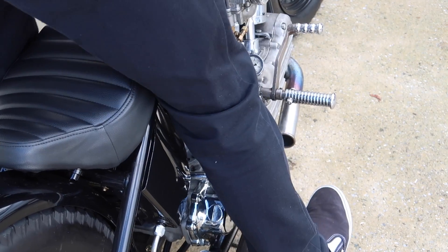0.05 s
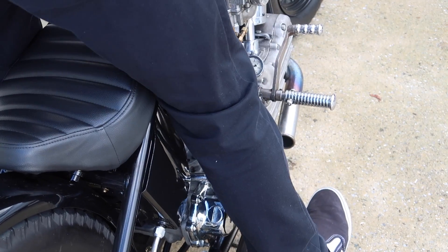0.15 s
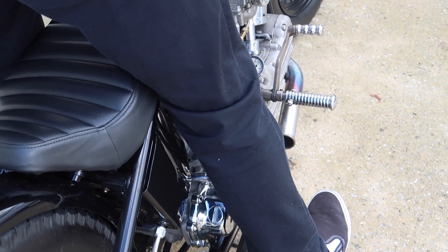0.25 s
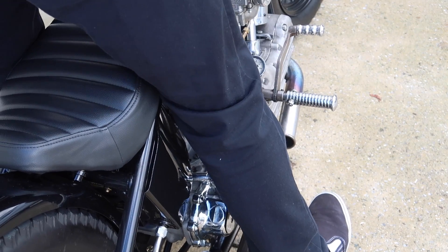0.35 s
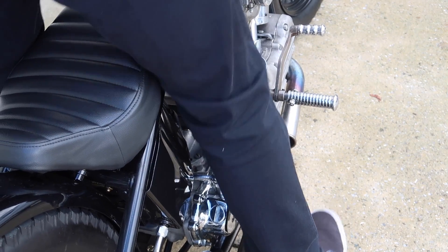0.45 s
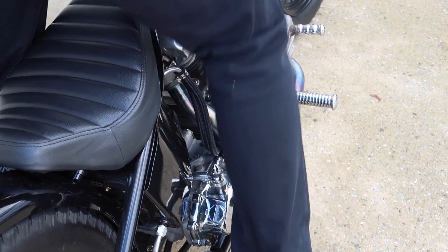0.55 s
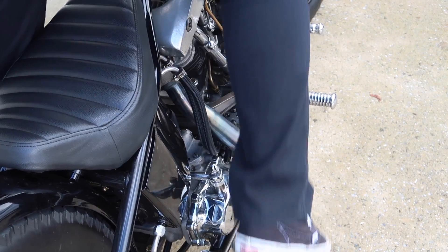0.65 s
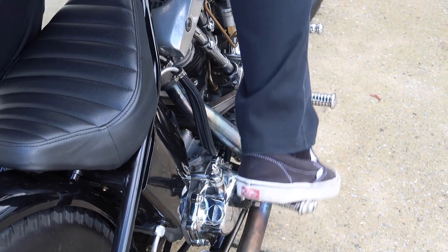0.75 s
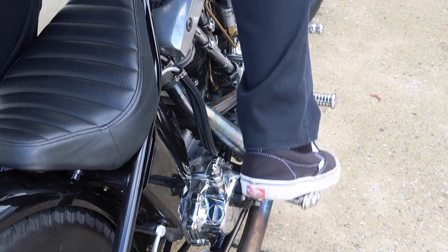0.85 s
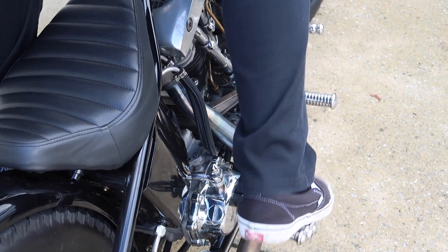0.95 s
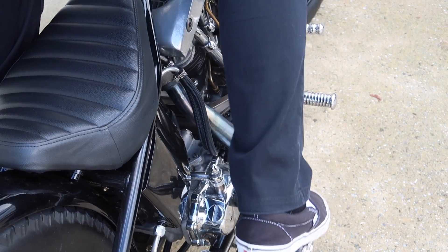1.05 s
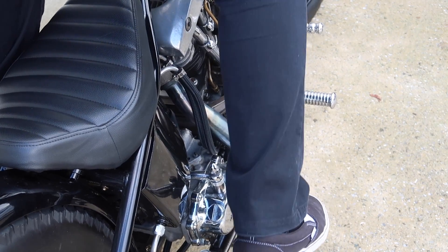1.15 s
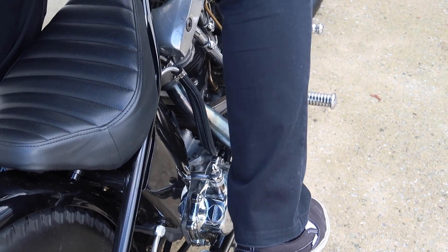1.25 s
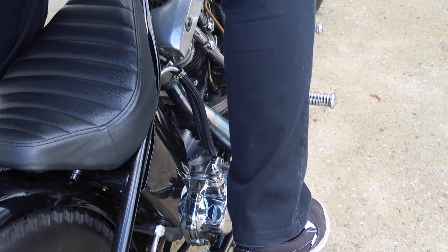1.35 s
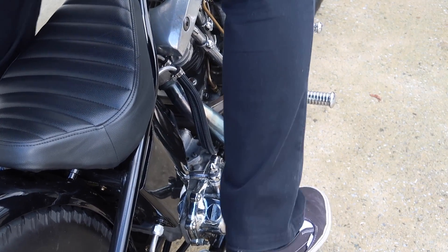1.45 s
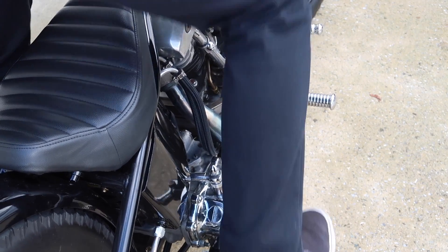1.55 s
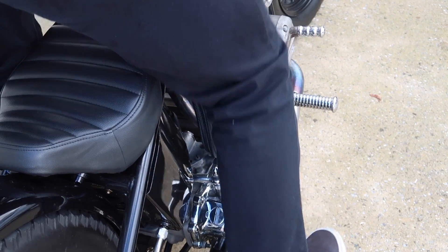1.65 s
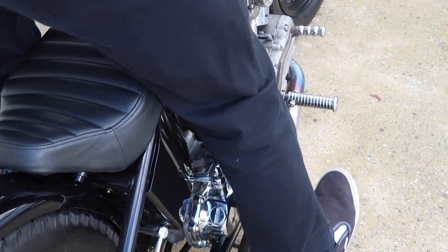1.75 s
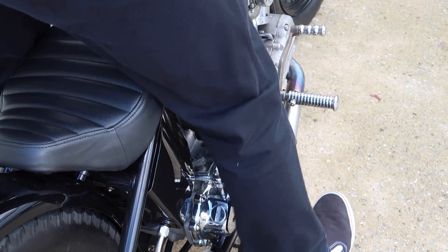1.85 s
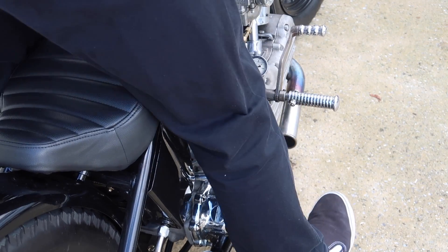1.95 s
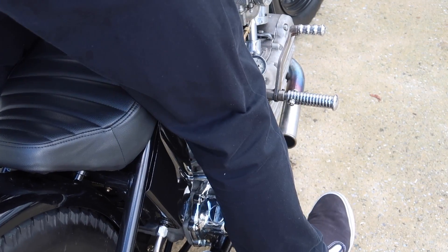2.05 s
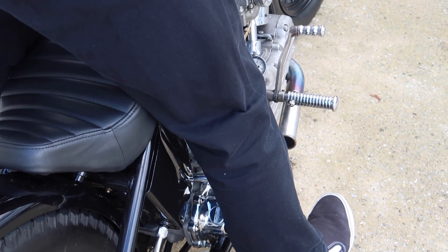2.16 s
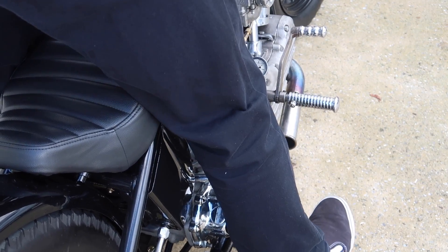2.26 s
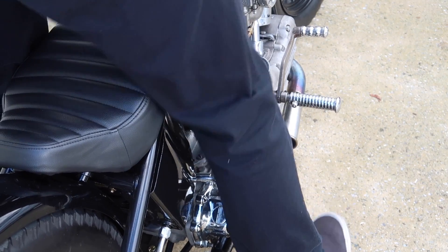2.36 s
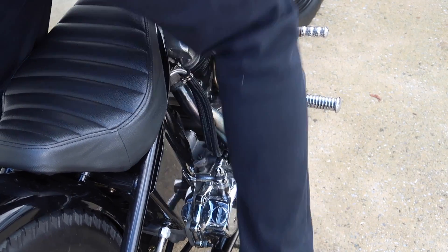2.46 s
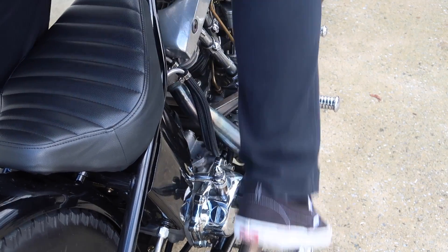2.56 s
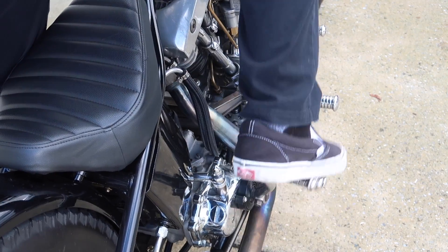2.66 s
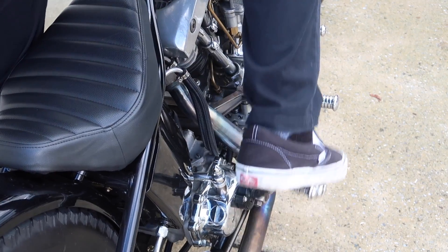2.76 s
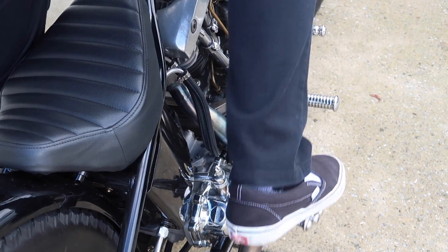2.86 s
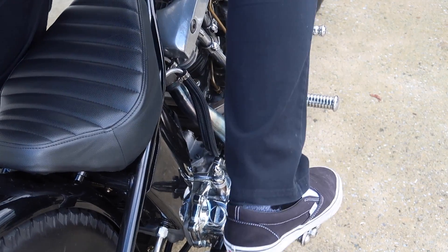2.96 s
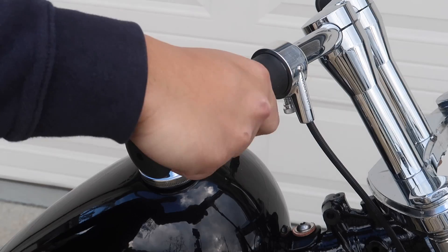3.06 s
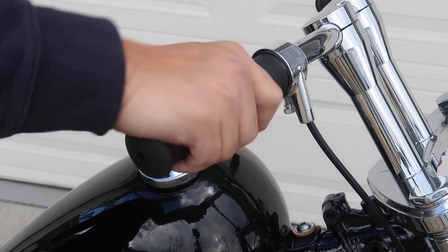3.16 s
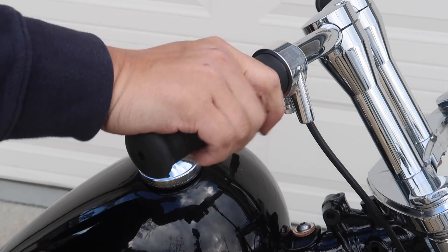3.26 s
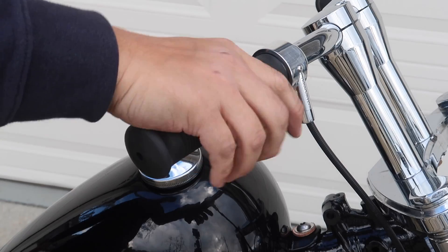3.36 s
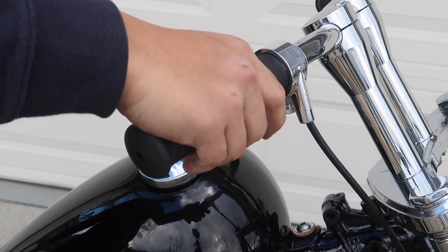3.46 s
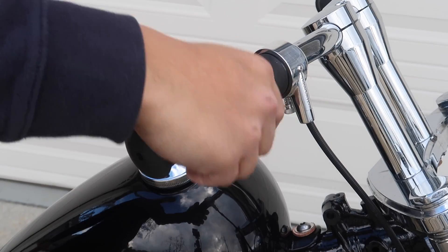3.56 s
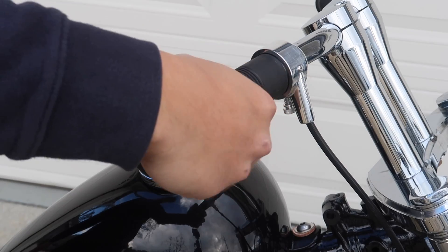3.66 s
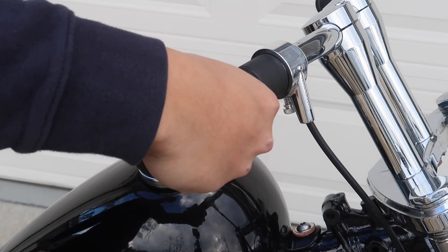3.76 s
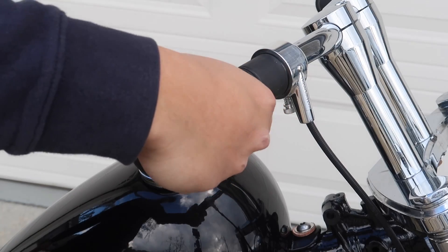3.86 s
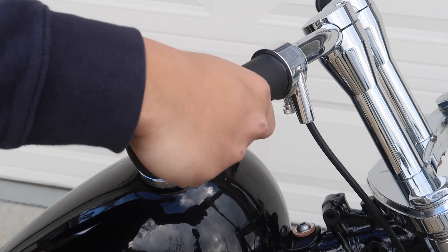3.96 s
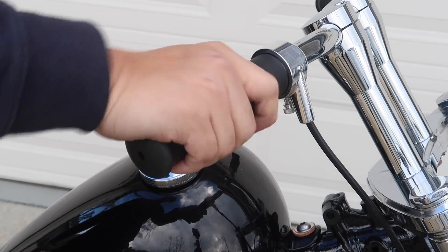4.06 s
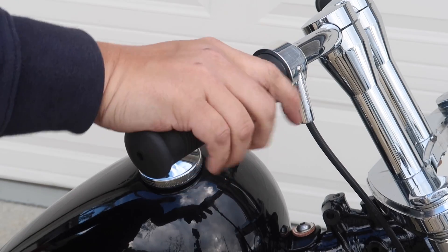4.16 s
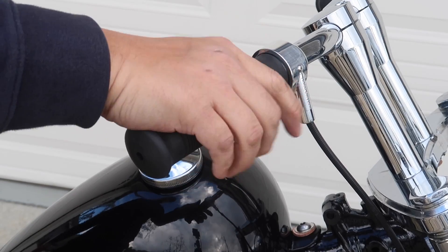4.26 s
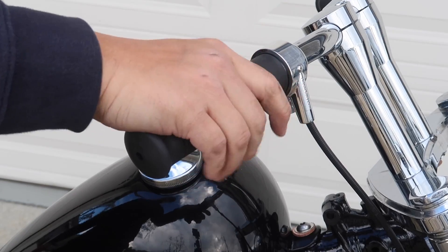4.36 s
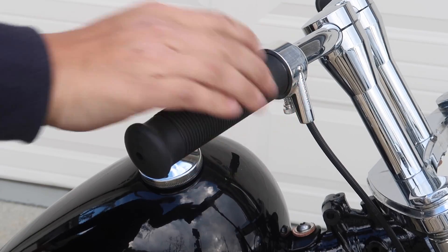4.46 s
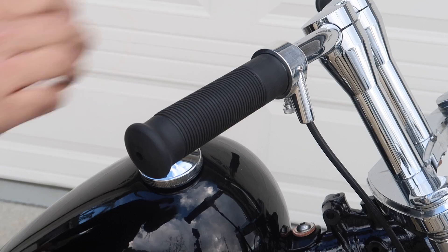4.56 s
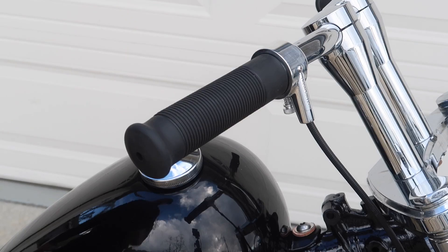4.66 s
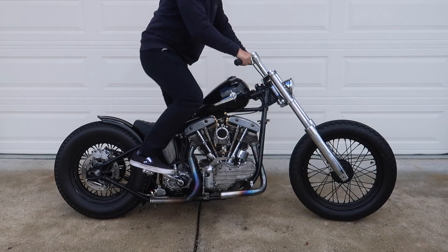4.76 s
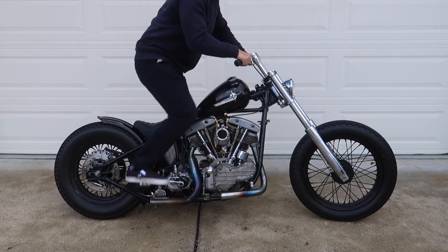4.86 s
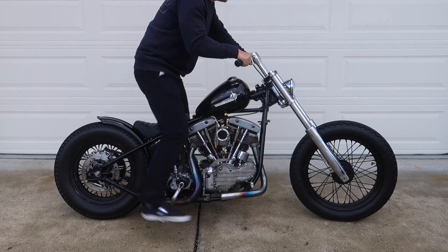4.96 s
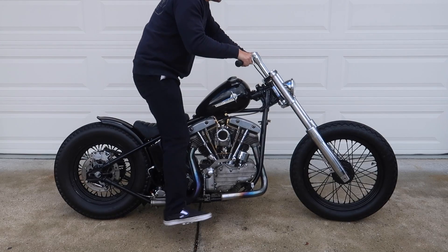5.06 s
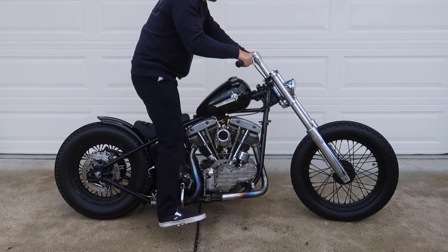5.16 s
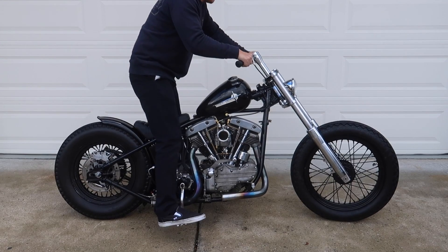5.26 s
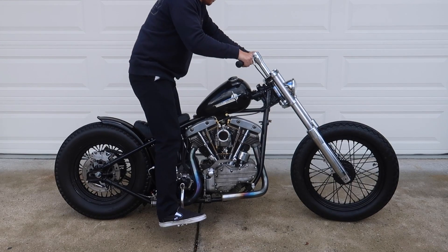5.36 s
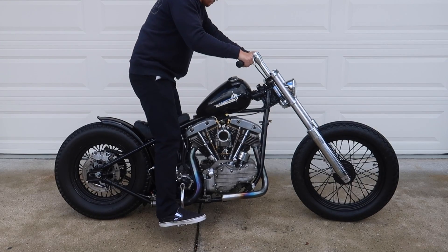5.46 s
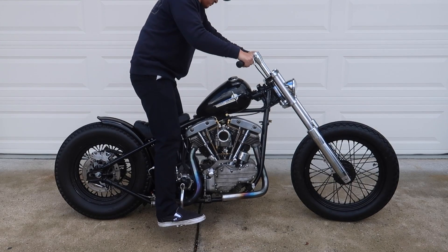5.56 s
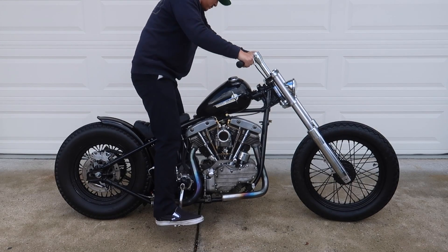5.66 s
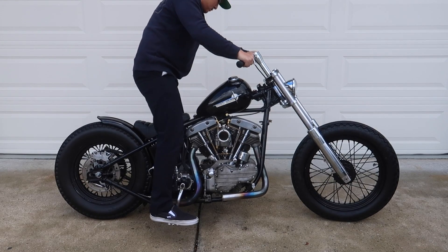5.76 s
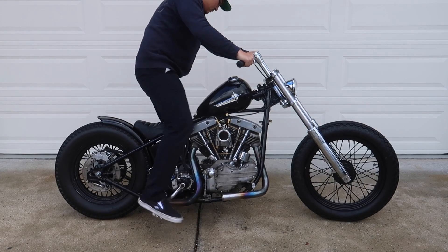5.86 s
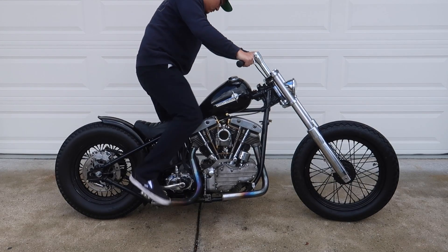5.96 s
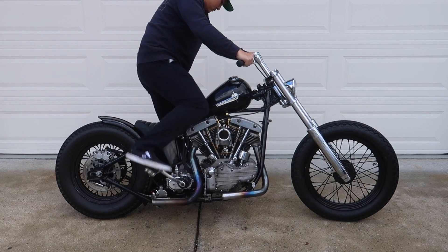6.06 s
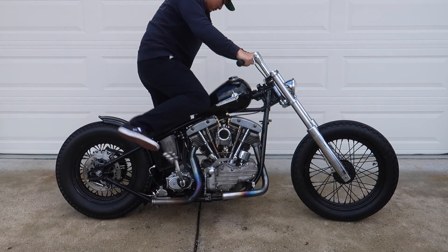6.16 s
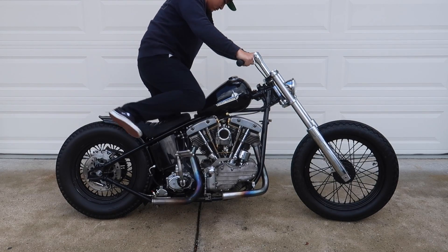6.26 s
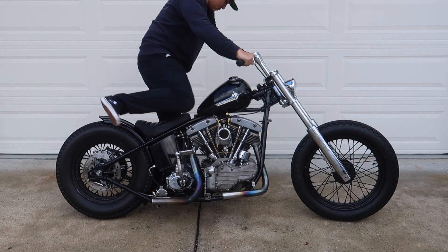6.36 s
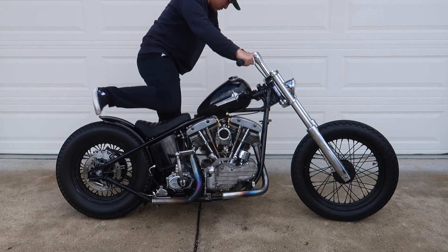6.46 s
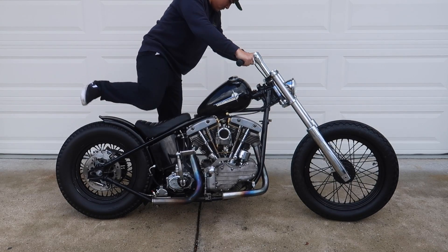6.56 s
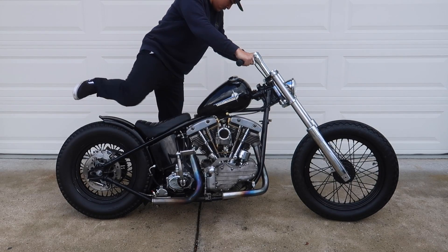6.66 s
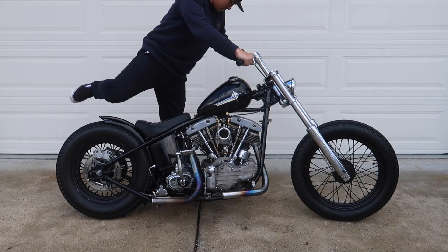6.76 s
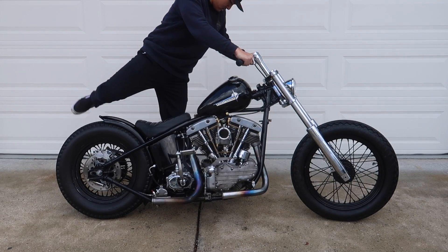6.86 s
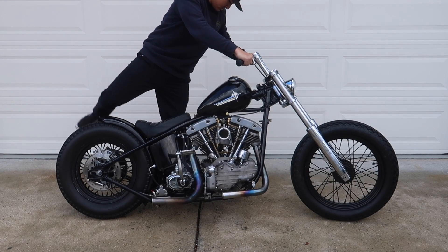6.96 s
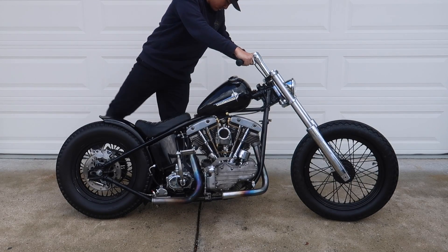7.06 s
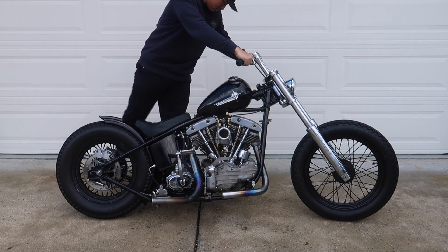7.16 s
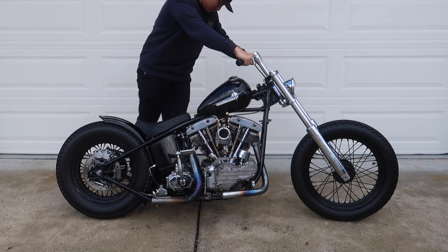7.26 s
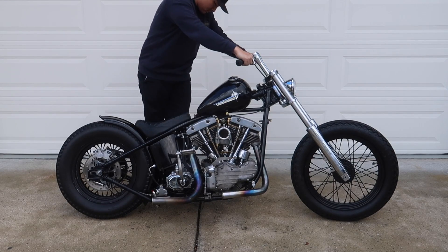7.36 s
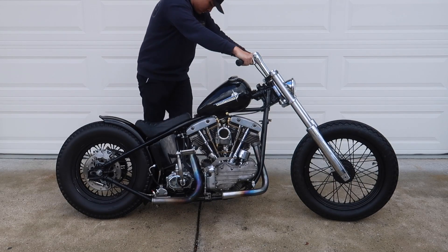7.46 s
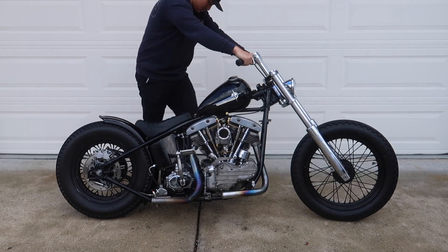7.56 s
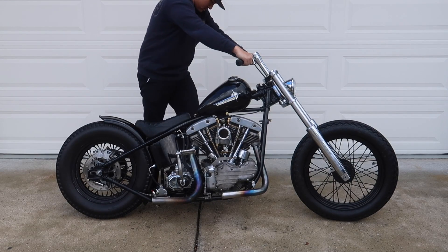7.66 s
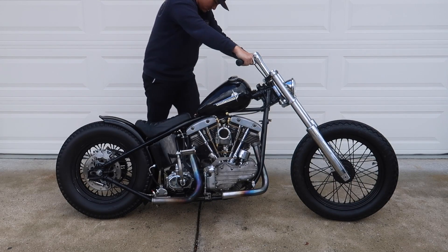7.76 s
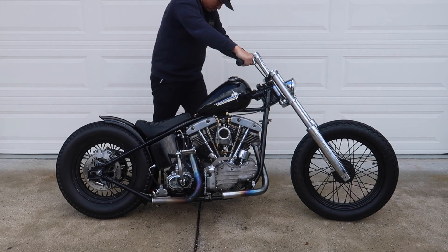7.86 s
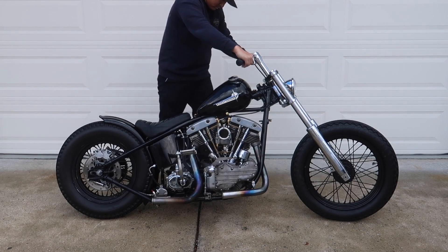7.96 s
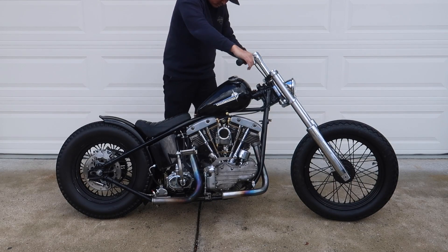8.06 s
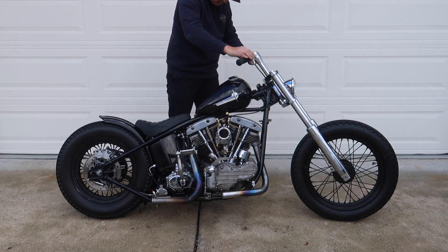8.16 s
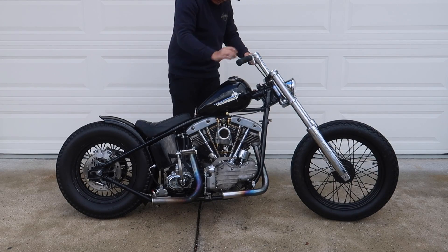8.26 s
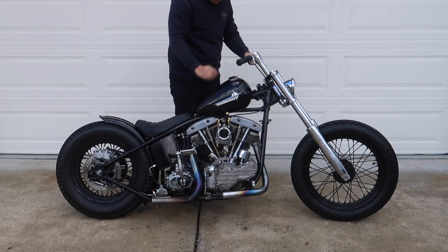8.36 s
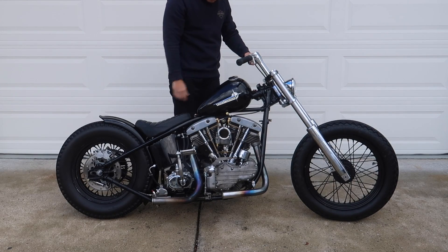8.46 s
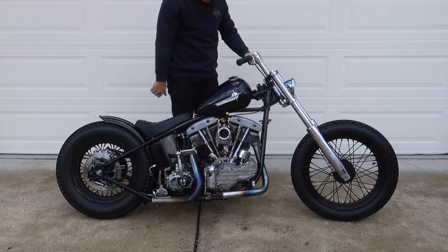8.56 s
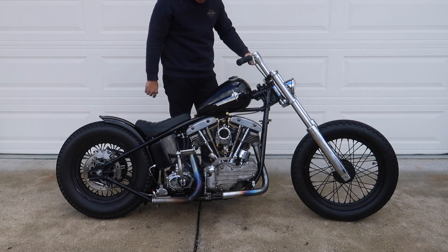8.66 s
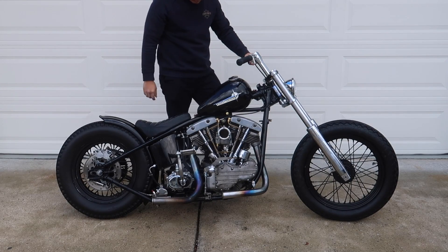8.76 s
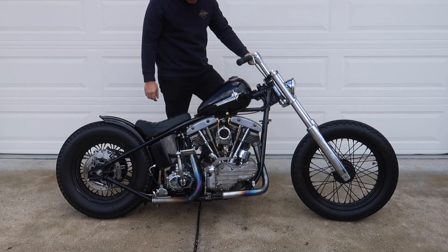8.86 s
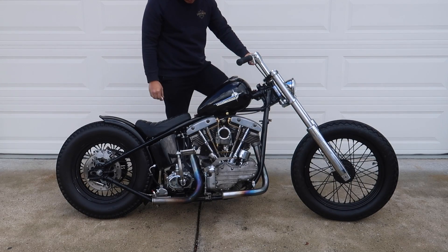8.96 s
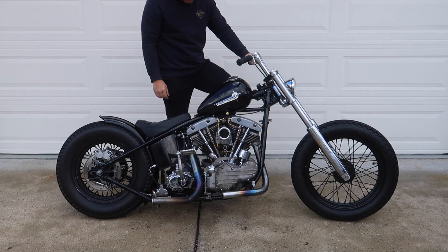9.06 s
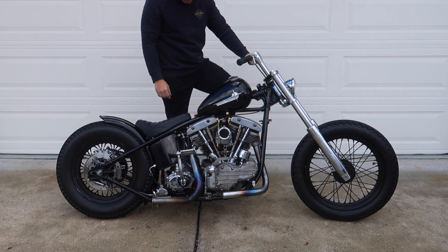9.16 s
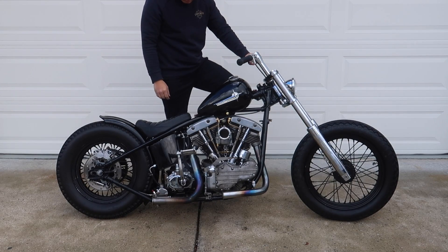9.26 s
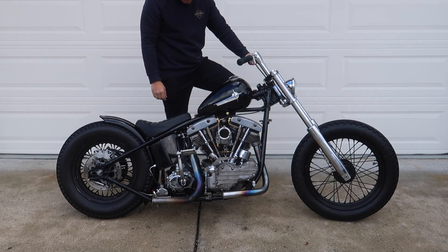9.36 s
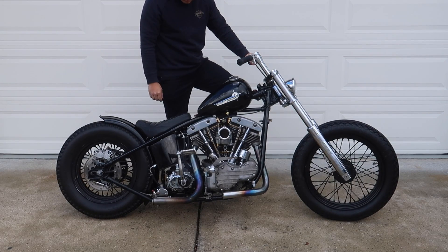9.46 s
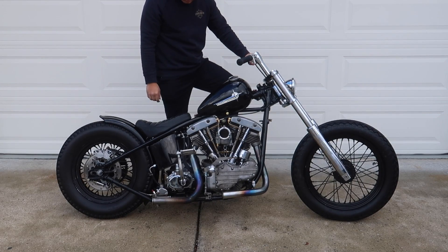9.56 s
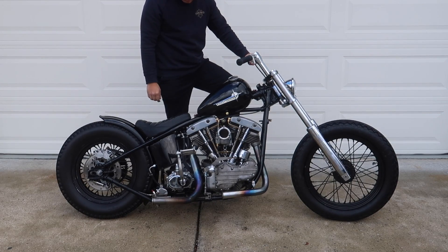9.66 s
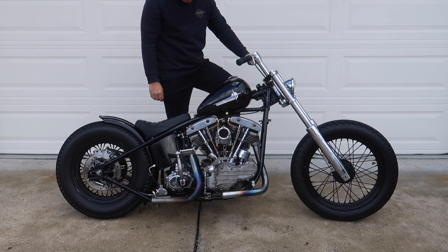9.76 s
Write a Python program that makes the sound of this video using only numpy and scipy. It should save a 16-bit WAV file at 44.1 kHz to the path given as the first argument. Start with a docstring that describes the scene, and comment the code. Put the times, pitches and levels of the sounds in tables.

```python
"""A big V-twin with short open pipes is kicked over, catches at about 5.3 s and lopes at idle; from 7.9 s the
rear cylinder misses every other cycle. Each exhaust stroke is a crack of jet noise and a pipe ring, a sine that
climbs in pitch until the valve shuts. Before that the lever ratchets (noise bursts striking decaying modes),
parts rub and gas wheezes under the last kicks (swells of filtered noise), a hand rustles on the throttle grip
and the grip snaps shut twice. Clatter fills the idle; distant traffic and air, and a barely audible high
whistle, lie beneath."""
import sys
import numpy as np
from scipy import signal
from scipy.io import wavfile
from scipy.ndimage import uniform_filter1d

SR = 44100
rng = np.random.default_rng(int(sys.argv[2]) if len(sys.argv) > 2 else 0)


def bounce(signal):
    """Save signal as a 16-bit WAV file at the path given by the first command-line argument."""
    frames = np.transpose(np.atleast_2d(signal))
    limited = np.clip(frames, -1, 1)
    pcm = np.round(limited * 32767).astype(np.int16)
    wavfile.write(sys.argv[1], SR, pcm)


N = 433062
T = np.arange(N) / SR

# ringing modes of crankcase and lever: f/Hz, relative level/dB, t60/s
CASE_MODES = [(740, -28, 0.05), (871, -12, 0.19), (1016, -18.5, 0.13), (1105, -8, 0.15),
              (2064, -10.5, 0.05), (2307, -14.5, 0.14), (2630, -10, 0.03), (3046, -21.5, 0.21),
              (3850, -18, 0.096), (4440, -21.5, 0.095)]


def undb(db):
    """Level in decibels to amplitude ratio."""
    return np.exp(np.asarray(db) * np.log(10) / 20)


def unit(x):
    """Normalization to an rms of 1."""
    return x / np.sqrt(np.mean(x ** 2))


def band(x, hz, width_hz):
    """Second-order resonance with gain 1 at its centre."""
    return signal.lfilter(*signal.iirpeak(hz, hz / width_hz, fs=SR), x)


def colour(x, bands):
    """Superposed broad resonances, each a cascade of two: (f/Hz, width/Hz, relative level/dB)."""
    return sum(undb(db) * band(band(x, hz, width), hz, 2 * width) for hz, width, db in bands)


def ring(x, modes):
    """Modal response: each mode's impulse response is a decaying sine."""
    out = 0
    for hz, db, t60 in modes:
        pole = np.exp((2j * np.pi * hz - np.log(1000) / t60) / SR)
        out = out + undb(db) * signal.lfilter([0, pole.imag], [1, -2 * pole.real, abs(pole) ** 2], x)
    return out


def dull(x, hz):
    """Low-pass radiation: heavy castings give off little above hz."""
    return signal.sosfilt(signal.butter(2, hz, fs=SR, output="sos"), x)


def fade(t, t60):
    """Exponential decay by 60 dB in t60 seconds, from t = 0."""
    return np.exp(-np.log(1000) * np.maximum(t, 0) / t60)


def walk(rate):
    """Slow random modulation: Gaussian values joined by straight ramps of 1 / rate seconds."""
    k = int(SR / rate)
    return uniform_filter1d(np.repeat(rng.standard_normal(N // k + 1), k), k)[:N]


def add(out, s, x):
    """Superposition of x on out from time s."""
    k = int(s * SR)
    out[k:k + len(x)] += x[:N - k]


def swell(t, s, rise_s, hold_s, t60, db):
    """Exponential envelope: climbs 28 dB in rise_s up to time s, holds, then decays."""
    return undb(db - 28 * np.maximum(s - t, 0) / rise_s) * fade(t - s - hold_s, t60)


def play(rows, voice):
    """Amplitude modulation of voice(span, last column) by each row's swell."""
    out = np.zeros(N)
    for s, rise_s, hold_s, t60, db, control in rows:
        span = slice(int(max(s - 2 * rise_s, 0) * SR), int((s + hold_s + t60) * SR))
        out[span] += swell(T[span], s, rise_s, hold_s, t60, db) * voice(span, control)
    return out


def chatter(events, t60, tail_db, tail_t60, rise_s=0.00068):
    """Impact excitation: each blow (t/s, level/dB) is a quick noise tick and a dying chatter of bounces."""
    drive = np.zeros(N)
    t = np.arange(int(.25 * SR)) / SR
    shape = np.clip(t / rise_s, 0, 1) * (fade(t, t60) + undb(tail_db) * fade(t, tail_t60))
    for (s, db), noise in zip(events, rng.standard_normal((len(events), len(t)))):
        add(drive, s, undb(db) * noise * shape)
    return drive


def air():
    """Band-filtered noise of distant traffic and air; each band flickers alone, the bass is alike on both ports."""
    # spectrum, interpolated over log frequency: f/Hz, relative level/dB
    spectrum = [(25, 16.5), (45, -14.5), (81, 15.5), (150, -7.5), (240, -11), (440, -20.5), (1000, -36),
                (2500, -23), (6000, -81.5), (15000, -83.5)]
    hz_points, db_points = np.transpose(spectrum)
    out = 0
    for hz in 28 * 2 ** np.arange(0, 9.1, .7):
        mid = band(rng.standard_normal(N), hz, hz / 2)
        side = band(rng.standard_normal(N), hz, hz / 2)
        db = np.interp(np.log(hz), np.log(hz_points), db_points) + 2.0 * walk(15)
        side_share = np.clip(hz / 500 - .2, 0, 1)
        out = out + undb(db) * (mid + side_share * side * np.array([[1], [-1]]))
    return unit(out) * undb(-45)


def whistle():
    """A pure tone at 10.1 kHz; growth and decay cross at 0.5 s, where it peaks near -84 dB."""
    # the negative hold starts the decay before the growth is complete
    return swell(T, s=2, rise_s=1.5, hold_s=-1.5, t60=.08, db=-56) * np.sin(2 * np.pi * 10100 * T)


def rub_and_wheeze():
    """Swells of noise, part rung through the case, part dry: gears and shoe rubbing, and from 4.99 s gas
    wheezing under the last kicks; a thin whine rides on the fizz."""
    # swells: loudest from t/s, rise/s, hold/s, t60/s, level/dB, fizz against body/dB
    rubs = [(.03, .12, 0.025, .3, -24.5, -9), (.1, 0.091, .01, 0.85, -36.5, -7),
            (.54, .06, .005, .1, -35, -27), (.86, .02, .02, 0.45, -42, -31),
            (1.0, 0.087, .01, .2, -43, -38), (1.17, .06, 0.0091, 0.42, -50.5, -9),
            (1.63, 0.11, 0.085, .3, -38.5, -10), (1.79, 0.16, 0.069, 0.23, -27.5, -16),
            (2.07, 0.26, 0.034, 0.77, -42.5, -4.5), (2.41, 0.12, .01, .1, -45, -20),
            (2.83, .15, 0.045, 1.05, -44.5, -30), (4.87, .02, .08, .3, -50.5, -19),
            (4.99, 0.032, 0.046, .2, -29, 0.5), (5.08, 0.049, 0.0046, 0.19, -21, -9),
            (5.195, 0.062, .005, 0.19, -20, -9), (5.3, .03, 0.0055, 0.092, -26, -9)]
    # thin treble resonances: f/Hz, width/Hz, relative level/dB
    whine = [(2415, 93, 1), (3840, 63, -4), (3950, 40, -6), (4910, 59, -4), (5600, 52, -9.5),
             (6420, 38, -10.5), (7500, 40, -10)]
    ends_s = 5.7
    noise = rng.standard_normal((2, N)) * undb(2.0 * walk(150))
    grit, spray = noise[:, :int(ends_s * SR)]
    rung = unit(dull(ring(grit, CASE_MODES), 7700))
    dry_rub = unit(colour(grit, [(438, 480, 13.3), (787, 950, 10.3), (1400, 810, 3.3), (2310, 970, 2.1)]))
    body = unit(0.43 * rung + dry_rub)
    hiss = unit(dull(band(spray, 4600, 4500), 9200))
    fizz = unit(hiss + 0.83 * unit(colour(grit, whine)))
    return play(rubs, lambda span, treble_db: body[span] + fizz[span] * undb(treble_db))


def pipe_ring(open_s, blow_db, top_db, open_hz, shut_hz, overtones):
    """Resonance of a shrinking cavity: the note climbs as the cylinder volume falls, then dies once the valve shuts."""
    start_turns, rise_s, shut_t60_s, lag_s = 0.057, 0.0033, 0.067, .004
    t = np.arange(int((open_s + .12) * SR)) / SR
    travel = np.clip(t / open_s, 0, 1)
    hz = open_hz + (shut_hz - open_hz) * travel ** 22.0  # nearly all the climb comes at the end
    loud = undb(blow_db + (top_db - blow_db) * travel ** 1.4)
    loud = loud * fade(t - open_s - lag_s, shut_t60_s) * np.clip(t / rise_s, 0, 1)
    out = loud * np.sin(2 * np.pi * (start_turns + np.cumsum(hz) / SR))
    late = np.maximum(t - lag_s, 0)
    for mode_hz, db, t60 in overtones:
        envelope = fade(late, t60) * np.clip(late / 0.001, 0, 1)
        out += undb(blow_db + db) * np.sin(2 * np.pi * mode_hz * late) * envelope
    return out


def jet_puff():
    """Choked-flow envelope: the jet swells as the valve cracks open, chokes off as pressure goes, and trails away."""
    crack_s, tail_db, tail_t60_s = 0.012, -6, 0.073
    t = np.arange(int(.1 * SR)) / SR
    progress = np.clip(t / crack_s, 0, 1)
    jet = np.sin(np.pi * progress ** 2.42)
    return jet + undb(tail_db) * progress * fade(t - crack_s, tail_t60_s)


def exhaust():
    """Blow-down excitation of every stroke: the pipe rings, and the jet envelopes of front and rear cylinder."""
    # slow strokes under the kick: t/s, valve open/s, crack level/dB, blow-down level/dB,
    # level at piston top/dB, pipe f while open/Hz
    kicked = [(.012, 0.16, -70, -34.5, -42, 68.6), (1.783, 0.14, -38, -22, -28.5, 66.6),
              (5.041, 0.089, -29, -13.5, -8, 73.4), (5.186, 0.061, -17.5, -5.5, -7, 79)]
    # front and rear pipe: f open/Hz, f shut/Hz, valve open share of the cycle,
    # blow-down level of a full burn/dB, weakest crack of a full burn/dB
    pipes = [(88.9, 140.6, 0.229, -10, -26), (91, 130.8, 0.211, -9.5, -26.5)]
    # higher pipe modes, mean over strokes: f/Hz, front and rear level against blow-down/dB, t60/s
    overtones = [(195, -2.5, -6.5, 0.039), (220.4, -20, -17, 0.13), (357.6, -8.5, -10.5, 0.12),
                 (456, -18, -42, 0.14), (685, -9, -40, 0.041), (1337, -20.5, -27.5, 0.096)]
    crack_lead_s = 0.0065
    puff = jet_puff()
    rings, gates = np.zeros(N), np.zeros((2, N))
    for s, open_s, crack_db, blow_db, top_db, open_hz in kicked:
        add(rings, s, pipe_ring(open_s, blow_db, top_db, open_hz, 114, [(346, -5.0, 0.079)]))
        add(gates[1], s, undb(crack_db) * puff)
    rows = strokes()
    cycle_s = 2 * uniform_filter1d(np.gradient(rows[:, 0]), size=3)
    chance = rng.standard_normal((len(rows), 2, len(overtones)))
    for k, (s, crack_db, top_db) in enumerate(rows):
        cylinder = k % 2
        open_hz, shut_hz, share, blow_db, burn_db = pipes[cylinder]
        blow_db += 1.03 * min(crack_db - burn_db, 0)  # a poor burn leaves little pressure to blow down
        # gas heat and turbulence shift the overtones from stroke to stroke
        modes = [(m[0] * (1 + 0.014 * a), m[1 + cylinder] + 1.34 * b, m[3])
                 for m, a, b in zip(overtones, *chance[k])]
        add(rings, s, pipe_ring(share * cycle_s[k], blow_db, top_db, open_hz, shut_hz, modes))
        add(gates[cylinder], s - crack_lead_s, undb(crack_db) * puff)
    return rings, gates


def cracks(gates):
    """Turbulent jet noise, coloured by each pipe's mouth and gated by the jet envelopes."""
    # f/Hz, width/Hz, front relative level/dB, rear relative level/dB
    mouth = [(656, 1350, -2, -15), (1318, 440, -4.5, -6), (2220, 260, 0.5, -2), (3084, 600, 5, -12),
             (3670, 430, -27, 6), (4414, 660, -2, -0.5), (5450, 3900, -7.5, -7), (9900, 4200, -19.5, -18.5)]
    hiss = rng.standard_normal(N)
    # the jet whistles in the pipe mouth a little differently each time
    bands = [band(band(hiss, hz, width), hz, 2 * width) * undb(2 * walk(25)) for hz, width, _, _ in mouth]
    out = np.zeros(N)
    for cylinder in range(2):
        jet = sum(undb(row[2 + cylinder]) * b for row, b in zip(mouth, bands))
        out += gates[cylinder] * unit(jet)
    return out


def blows():
    """Impacts of the pawl on the ratchet and of shoe and lever on the case: (t/s, blow/dB, thud against it/dB)."""
    # the pawl drops over the teeth, one row a swing: t/s
    teeth = [
        [.546, .587, .617, .649, .679, .712, .75, .8],
        [2.458, 2.492, 2.524, 2.547, 2.573, 2.602, 2.638, 2.676, 2.72],
    ]
    # knocks: t/s, blow level/dB, thud against the blow/dB
    knocks = [(0.059, -15, -1.5), (0.472, -22.5, -10), (0.498, -26, -1.5), (0.546, -24, 6),
              (0.927, -30, -20), (0.956, -19, -27), (0.982, -20.5, -7.5), (1.737, -18, -12.5),
              (1.763, -14, -10), (1.782, -15.5, -7.5), (1.85, -14.5, -17), (1.878, -14, -11.5),
              (1.91, -25.5, 2), (1.954, -24, -8), (2.055, -24, -14), (2.424, -17.5, -21),
              (2.858, -19, -10.5), (4.875, -34, -11)]
    first_db, middle_db, last_db, thud_db = -1.6, -4, -6.5, -27.5
    rows = []
    for swing in teeth:
        for s in swing:
            db = first_db if s == swing[0] else last_db if s == swing[-1] else middle_db
            rows.append((s, db, thud_db))
    return rows + list(knocks)


def lever():
    """Impact sound: clicks and knocks strike the case's modes, with a dull low-frequency thud."""
    # countless small case modes blurred into bands: f/Hz, width/Hz, relative level/dB
    case_blur = [(544, 1000, -8), (990, 414, 7.5), (1560, 740, 0), (2360, 1250, -3.5), (4000, 510, -24),
                 (6500, 3400, -31.5)]
    hits = blows()
    clicks = [row[:2] for row in hits]
    thud_hits = [(s, db + thud_db) for s, db, thud_db in hits]
    rung = undb(-34) * ring(chatter(clicks, 0.0061, 2, 0.13), CASE_MODES)
    blurred = undb(0.5) * colour(chatter(clicks, 0.009, -1.44, 0.12), case_blur)
    thuds = colour(chatter(thud_hits, 0.087, -0.49, 0.31), [(236, 160, 8.0), (465, 540, 11.5)])
    return dull(rung + blurred + thuds, 8100)


def hand():
    """Friction noise of skin on ribbed rubber: a soft rustle whose colour moves between low and high."""
    # swells: loudest from t/s, rise/s, hold/s, t60/s, level/dB, amplitude of the low rustle against the high
    slides = [(3.19, 0.098, 0.043, 0.15, -47, 1.4), (3.595, .15, .005, 0.15, -47.5, .1),
              (4.06, .05, 0.028, .2, -52, 2.4), (4.118, .06, .003, .2, -43, 1.6),
              (4.245, 0.11, .005, .05, -44.5, 1.0), (4.46, 0.092, 0.0045, .15, -48.5, .1)]
    grit = rng.standard_normal(N) * undb(4.5 * walk(200))
    low = unit(colour(grit, [(910, 410, 0)]))
    high = unit(colour(grit, [(2100, 800, 8), (6000, 11000, -22.0)]))
    return play(slides, lambda span, share: high[span] + share * low[span])


def grip():
    """Impact on a stop: the throttle springs back and excites its modes; cable and bar rattle on briefly."""
    # blows: t/s, blow level/dB
    snaps = [(3.168, -37), (3.318, -34.5), (3.375, -20), (3.383, 2.5), (3.72, -41.5), (4.05, -38),
             (4.08, -38), (4.124, -21), (4.243, -18), (4.249, 1.5)]
    # f/Hz, relative level/dB, t60/s
    modes = [(876, -6, .02), (1546, 5.5, 0.024), (1970, -9, 0.011), (2880, -10, .015)]
    # broad bands of the body: f/Hz, width/Hz, relative level/dB
    blur = [(406, 260, -8), (936, 640, 0), (1850, 1460, 3), (3200, 500, -10), (5940, 6900, -25),
            (11850, 10000, -29)]
    snap = undb(-22.0) * ring(chatter(snaps, 0.0086, -47.0, .03), modes)
    body = undb(6.5) * colour(chatter(snaps, 0.0098, -14.5, 0.12, 0.00017), blur)
    rattle = undb(-20) * colour(chatter(snaps, 0.26, -22.0, 0.74), [(2470, 770, -1)])
    return snap + body + rattle


def strokes():
    """Crank kinematics and misfires: rows (t/s, crack/dB, ring at piston top/dB), front and rear in turn."""
    # front exhaust strokes counted from the catch
    crank_count = [0, 1, 2, 4, 6, 10, 14, 18, 22, 24, 26, 29, 31, 33, 37, 41]
    # base curve at each count: t/s, crack level/dB, pipe ring level at piston top/dB
    crank = [(5.3202, -9, -9), (5.4474, -15.5, -10), (5.5551, -15, -9.5), (5.793, -19, -9.5),
             (6.0355, -18.5, -9), (6.5, -16.5, -9.5), (6.968, -18, -8.5), (7.42, -17.5, -8.5),
             (7.8631, -17, -10.5), (8.089, -17.5, -10), (8.3091, -17, -8), (8.6292, -18, -8.5),
             (8.8345, -18.5, -8.5), (9.027, -18.5, -8.5), (9.401, -19, -10.5), (9.7815, -20.5, -8)]
    # single poor or fierce burns: t/s, delay/s, change of crack/dB, change of ring/dB
    stumbles = [(5.375, 0.0063, -5, 1), (5.494, 0.0017, -2.5, .3), (5.555, .0001, -39, -2.5),
                (5.607, 0.0029, -1.7, -2.5), (5.674, 0.00033, 3.5, 0), (5.724, -0.0029, -10, 2),
                (6.384, .0005, 1.5, -1), (6.619, 0.0012, 1.5, .3), (6.899, -.002, -5.5, 3.5),
                (7.468, 0.00012, -1, 3), (7.53, -0.0013, 3, -.3), (7.798, -.002, -11, 3.5),
                (7.977, .0005, -2, 2), (8.246, 0.0032, .1, -.5), (8.67, 0.0017, 2, 2.5),
                (8.87, -0.001, .3, -6), (8.932, 0.00041, 2, -0.5), (9.064, -0.0025, -4, -2.5),
                (9.73, 0.0014, -1, -3)]
    # lags are shares of a cycle behind the front; levels are against the front's
    rear_lag, rear_crack_db, rear_ring_db = .43, -5.5, 0.74
    # a miss puffs earlier and weaker; its dB changes add to the rear's
    misses_from_s, miss_lag, miss_crack_db, miss_ring_db = 7.9, .41, -27, -1.5
    even_lag, even_drag_s = .45, .0015  # the cycles between misses run late
    scatter_db = [0.92, 0.7]  # crack, ring
    count = np.arange(crank_count[-1] + 1)
    s, crack_db, ring_db = (np.interp(count, crank_count, column) for column in np.transpose(crank))
    miss = (s > misses_from_s) & (count % 2 == 1)
    even = (s > misses_from_s - np.gradient(s)) & (count % 2 == 0)  # from about one cycle ahead of the misses
    s = s + even_drag_s * even
    lag = np.select([miss, even], [miss_lag, even_lag], rear_lag)
    front = [s, crack_db, ring_db]
    rear = [s + lag * np.diff(s, append=np.inf),
            crack_db + rear_crack_db + miss_crack_db * miss,
            ring_db + rear_ring_db + miss_ring_db * miss]
    # interleave front and rear; the last rear stroke has no following cycle and is dropped
    rows = np.transpose([front, rear], axes=(2, 0, 1)).reshape(-1, len(rear))[:-1]
    for at, *change in stumbles:
        rows[np.argmin(np.abs(rows[:, 0] - at))] += change
    rows[:, 1:] += rng.standard_normal((len(rows), 2)) * scatter_db
    return rows


def clatter(rings):
    """Modulated noise of tappets, chain, gears and gas rush: bands tick unevenly and swell with the pipe rings."""
    # f/Hz, width/Hz, relative level/dB
    gear_bands = [(230, 170, 16.5), (417, 75, 15.5), (760, 240, 7.5), (1410, 540, -3), (2220, 830, 0),
                  (4500, 1340, -6.5), (9150, 6000, -60.5)]
    # base level before the swelling: t/s, level/dB
    level = [(5.2, -43), (5.33, -32), (6.0, -28), (6.4, -32.5), (7.0, -33), (8.5, -32), (9.82, -32)]
    shared = 1.64 * walk(90)
    gear = 0
    for hz, width, db in gear_bands:
        ticking = rng.standard_normal(N) * undb(shared + 4.25 * walk(110))
        gear = gear + undb(db) * band(ticking, hz, width)
    pulse = 1 + 1.56 * uniform_filter1d(np.abs(rings), size=400)
    return dull(unit(gear), 8600) * pulse * undb(np.interp(T, *np.transpose(level), left=-200))


def port_side(mid):
    """Diffuse scattering: nearby surfaces scatter the treble unlike on the two ports, and the scatter wavers."""
    # until t/s, scattered above f/Hz, spread level/dB, left lead/dB
    ports = [(3.12, 5000, -0.5, -22.5), (4.8, 7000, 4.5, -28), (9.9, 6800, -0.5, -103)]
    t = np.arange(int(.02 * SR)) / SR
    scatter = rng.standard_normal(len(t)) * fade(t, 0.0084)
    spread = signal.fftconvolve(mid, scatter / np.linalg.norm(scatter))[:N]
    side, start, waver = np.zeros(N), 0, unit(walk(150))
    for until, hz, spread_db, lead_db in ports:
        treble = waver * signal.lfilter(*signal.butter(2, hz, "high", fs=SR), spread)
        side += ((T >= start) & (T < until)) * (undb(spread_db) * treble + undb(lead_db) * mid)
        start = until
    return side


def scene():
    """Superposition of all sources, spread to two ports as mid plus and minus side."""
    rings, gates = exhaust()
    engine = rings + cracks(gates) + clatter(rings)
    mid = engine + rub_and_wheeze() + lever() + hand() + grip() + whistle()
    side = port_side(mid)
    return np.array([mid + side, mid - side]) + air()


def record(dry):
    """Band limiting and clipping: the microphone drops the deepest bass; the recorder clips peaks and cuts the top."""
    thin = signal.sosfilt(signal.butter(2, 40, "high", fs=SR, output="sos"), dry)
    clipped = np.clip(thin, -1, 1)
    return signal.sosfilt(signal.ellip(12, .2, 100, 15700, fs=SR, output="sos"), clipped)


dry = scene()
out = record(dry)
bounce(out)
```